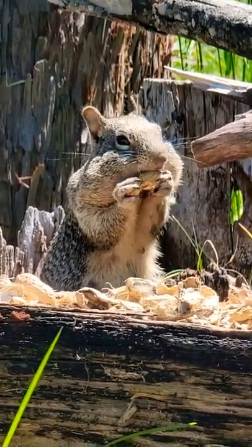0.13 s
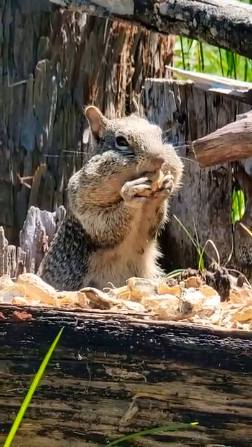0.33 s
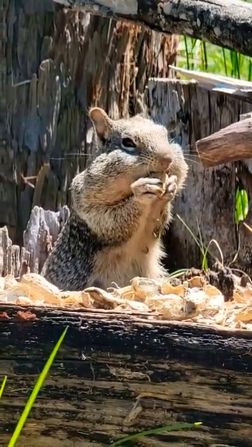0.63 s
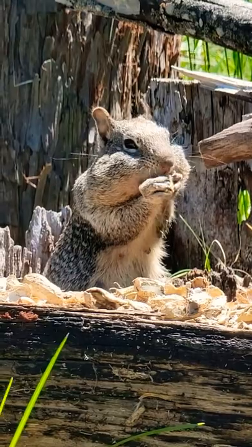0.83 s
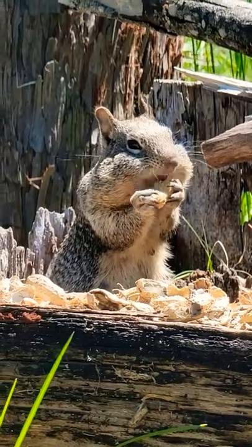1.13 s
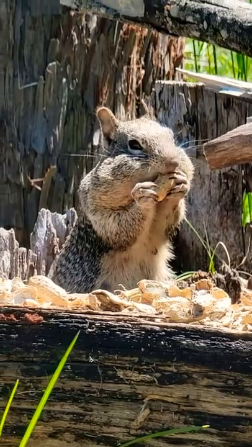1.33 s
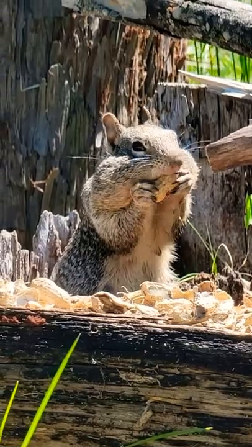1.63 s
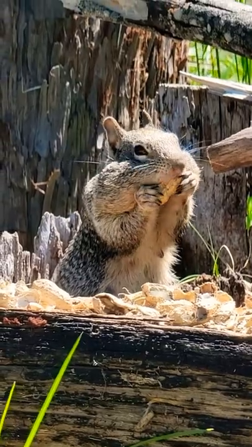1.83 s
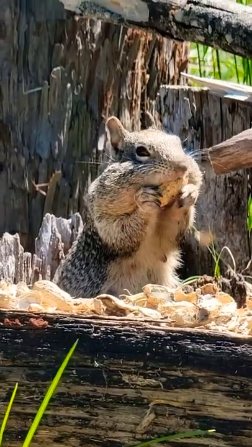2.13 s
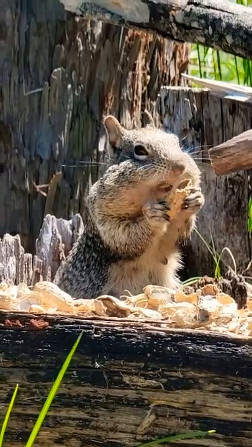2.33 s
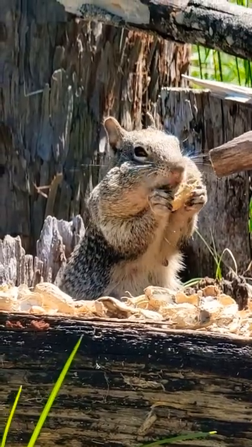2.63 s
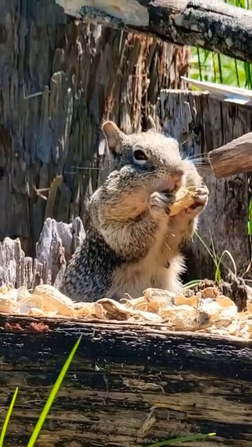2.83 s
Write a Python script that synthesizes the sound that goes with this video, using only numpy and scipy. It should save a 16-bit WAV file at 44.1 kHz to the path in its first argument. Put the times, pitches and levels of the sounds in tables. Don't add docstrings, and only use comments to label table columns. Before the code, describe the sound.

A squirrel cracks a dry nut shell in crisp clicks while birds chirp across a breezy yard

```python
import sys
import numpy as np
from scipy import signal
from scipy.fft import rfft, irfft
from scipy.io import wavfile
from scipy.ndimage import uniform_filter1d

SR = 44100
rng = np.random.default_rng(int(sys.argv[2]) if len(sys.argv) > 2 else 0)


def ratio(d):
    e = np.asarray(d, float) / 20
    return 10 ** e


def unload_wav(signal):
    wavfile.write(
        sys.argv[1],
        SR,
        np.round(np.clip(np.atleast_2d(signal).T, -1, 1) * 32767).astype(np.int16),
    )


N = 131859


def evened(x):
    return x / np.sqrt(np.mean(x ** 2) + 1e-20)


def read(points, hz):
    f, value = np.transpose(points)
    return np.interp(np.log(hz + 1), np.log(f + 1), value)


def add(mix, start_s, sound):
    at = round(start_s * SR)
    part = mix[max(at, 0):][:max(len(sound) + min(at, 0), 0)]
    part += sound[max(-at, 0):][:len(part)]


def drift(count, span_s):
    size = max(int(span_s * SR), 1)
    smooth = uniform_filter1d(rng.standard_normal(count), size)
    return evened(uniform_filter1d(smooth, size))


def band_passed(x, low_hz, high_hz):
    return signal.sosfilt(signal.butter(2, [low_hz, high_hz], "band", fs=SR, output="sos"), x)


# start_s, peak_db, brightest_hz, hollow_body_db, side_wall_db
SNAPS = [(.294, -54, 10000, 0.1, 0.1), (0.3364, -39, 10500, -5, -8), (0.3445, -26, 12160, -3, -8),
         (0.3473, -36, 13000, -5, -8), (0.353, -35, 12500, -5, -3), (0.3555, -47, 11000, -5, -5),
         (0.656, -46, 6130, -14, 5), (0.7277, -43, 10110, -7, 0.1), (0.7466, -15, 7150, -16, 2),
         (.7495, -37, 6000, -13, -2), (0.7625, -36.5, 6000, -8, 2), (0.9174, -23, 7500, 14, -8),
         (0.9194, -26, 7660, 14, -10), (.9217, -34, 7500, 8, -6), (0.933, -46, 6500, -5, -3),
         (.9455, -41.5, 7500, -3, -1), (1.047, -46, 12900, -3, -5), (1.0685, -26.5, 7800, 16, -10),
         (1.0715, -37, 6550, 5, -8), (1.0797, -33, 13540, 0.1, -3), (1.1962, -33, 8030, -8, 3),
         (1.1993, -27, 9200, -8, 5), (1.206, -41, 7000, -5, -1), (1.334, -58, 6234, -3, 2),
         (2.368, -49.5, 9000, -5, 7), (2.426, -47.5, 10300, -5, -10), (2.747, -60, 7450, -5, -8),
         (2.879, -59, 7300, -9, -8), (2.095, -61, 9119, -5, -5)]
# pitch_hz, level_db, t60_s (time to fade by 60 dB)
SHELL = [(2300, -15, .01), (3320, 3, .016), (4770, 1, 0.025), (5360, 1, 0.016), (5720, -3.5, 0.028),
         (6260, -1, 0.014), (7100, -5, .014), (7580, -2, 0.01), (8030, -4.5, 0.016), (8800, -13, .01),
         (10510, 1.5, 0.0061), (13000, 1.5, .009), (14100, 3, 0.0062), (14820, 5, .008)]


def shell_snaps():
    out = np.zeros(N)
    t = np.arange(2300) / SR
    lead_s = 1100 / SR
    u = t - lead_s
    before = np.minimum(u, 0)
    creak = ratio(-22) * np.exp(before / 0.00036)
    grind = ratio(-43) * np.exp(before / 0.007)
    crumb_db, crumb_t60_s = -12, 0.013
    crumb_fade = 0.38 * ratio(crumb_db - 60 * u / crumb_t60_s)
    strain = np.where(u < 0, creak + grind, crumb_fade)
    tick = abs(u) < 0.5 / SR

    hz, db, t60_s = np.transpose(SHELL)[:, :, None]
    ring_fade = ratio(-60 * t / t60_s) + ratio(8 - 60 * t / 0.0025)
    sides = (-1.) ** np.arange(len(SHELL))[:, None]
    spread_oct, luck_db = 0.77, -2
    for start_s, peak_db, bright_hz, hollow_db, wall_db in SNAPS:
        luck = rng.standard_normal((len(SHELL), 2))
        grip_db = hollow_db * (hz < 4000) + wall_db * (hz > 5000) * (hz < 6000)
        bright_db = -6 * (np.log2(hz / bright_hz) / spread_oct) ** 2
        colour_db = db + grip_db + luck_db * luck[:, :1] + bright_db
        tones = np.sin(2 * np.pi * hz * (1 + 0.0035 * luck[:, 1:]) * t)
        ring = (sides * ratio(colour_db) * tones * ring_fade).sum(0)
        crumbs = rng.standard_normal(len(t)) * strain
        snap = signal.fftconvolve(crumbs + tick, ring)[:len(t)]
        add(out, start_s - lead_s, ratio(peak_db - 3.5) * snap / abs(snap).max())
    return out


# start_s, length_s, level_db, centre_hz
RUSTLES = [
    (0.276, 0.18, -77, 11100),
    (0.6, 0.1, -74, 6000),
    (.93, 0.02803, -74, 9000),
    (1.317, 0.11, -80, 6450),
    (2.342, 0.16, -80, 7900),
    (1.188, 0.0077, -58, 9100),
]


def paw_rustles():
    out = np.zeros(N)
    for start_s, length_s, db, centre_hz in RUSTLES:
        t = np.arange(0, length_s, 1 / SR)
        grit = rng.standard_normal(len(t)) * ratio(6 * drift(len(t), 0.004))
        grit = band_passed(grit, centre_hz / 1.4, min(centre_hz * 1.4, 16000))
        add(out, start_s, ratio(db) * evened(grit) * np.sin(np.pi * t / length_s))
    return out


def note(length_s, from_hz, to_hz, db, warble_hz, wobble):
    t = np.arange(0, length_s, 1 / SR)
    warble_rate_hz = 174.8 * (1 + 0.053 * drift(len(t), 0.012))
    warble = np.sin(2 * np.pi * (np.cumsum(warble_rate_hz) / SR + rng.random()))
    depth = warble_hz / 124
    hz = from_hz + (to_hz - from_hz) * t / length_s + warble_hz * warble
    hz = hz + wobble * 18 * drift(len(t), 0.0033) * depth
    flutter_db = 2.8 * drift(len(t), 0.0034) * min(depth, 1)
    shape = np.sin(np.pi * (t / length_s) ** 0.6) ** 0.78 * ratio(flutter_db)
    return ratio(db + 9) * shape * np.sin(2 * np.pi * np.cumsum(hz) / SR)


# start_s, level_db, pitch_factor, stretch_factor
CHIRPS = [
    (-.07, -61, 1.027, 0.79),
    (.285, -59, 1.02, 0.91),
    (.678, -58, 1.027, 0.82),
    (1.016, -57.5, 1.01, 0.85),
    (1.382, -60.5, 1.01, 1.03),
    (1.94, -63, 1.05, 1.07),
    (2.35, -60.5, 1, 1.09),
]
# length_s, from_hz, to_hz, level_db, warble_hz (depth)
OPENINGS = [
    (.055, 4090, 4100, -74, 120),
    (0.055, 4050, 4030, -67, 150),
    (0.048, 4080, 4040, -57.5, 130),
    (0.05, 4400, 3600, -54, 76),
    (0.061, 4170, 4100, -62.5, 150),
    (.062, 4340, 4290, -56, 180),
    (.075, 4150, 3980, -60.5, 250),
]
# delay_s, length_s, from_hz, to_hz, level_db
NOTES = [
    (.012, 0.046, 3370, 3225, -8),
    (.052, 0.083, 3320, 3090, 2.6),
    (.062, 0.0905, 3670, 3500, -6),
    (.085, 0.071, 2900, 2770, -3.5),
    (.045, 0.08, 4200, 4000, -10),
]


def sparrow():
    out = np.zeros(N)
    rasp_s = 0.15
    t = np.arange(0, rasp_s, 1 / SR)
    rasp_shape = np.sin(np.pi * (t / rasp_s) ** 0.28)
    for (start_s, db, pitch, stretch), opening in zip(CHIRPS, OPENINGS):
        rasp = evened(band_passed(rng.standard_normal(len(t)), 3600, 6040))
        add(out, start_s - 0.015, ratio(db - 7) * rasp * rasp_shape)
        add(out, start_s, note(*opening, wobble=0.9))
        for delay_s, length_s, from_hz, to_hz, rel_db in NOTES:
            tone = note(length_s * stretch, from_hz * pitch, to_hz * pitch, db + rel_db, 105, wobble=0.6)
            add(out, start_s + delay_s * stretch, tone)
    return out


# start_s, length_s, from_hz, to_hz, level_db
WHISTLES = [(0.192, 0.098, 5530, 5390, -73.5), (0.248, 0.069, 4850, 4000, -68),
            (0.765, 0.12, 5150, 4830, -64), (0.878, 0.068, 4510, 3790, -63),
            (1.897, 0.096, 5620, 5610, -81.5), (1.92, 0.032866, 5200, 5030, -69),
            (1.996, 0.03194, 4950, 4850, -70), (2.592, 0.039, 3600, 3575, -65.5),
            (2.956, 0.0335, 4280, 4480, -72), (0.471, 0.057, 4010, 3745, -71),
            (1.553, 0.037, 3444, 3350, -65.5), (0.942, .09, 3390, 3300, -70),
            (2.562, 0.038, 2930, 2930, -70)]
WHISTLE_WARBLE_HZ = [188, 400, 310, 300, 26, 93, 91, 24, 20, 105, 116, 200, 40]


def far_birds():
    out = np.zeros(N)
    for (start_s, *whistle), warble_hz in zip(WHISTLES, WHISTLE_WARBLE_HZ):
        add(out, start_s, note(*whistle, warble_hz, wobble=4.2))
    return out


def ports(x, lead, pan_db):
    right = irfft(rfft(x) * np.exp(-1j * lead), N)
    return np.array([x * ratio(pan_db / 2), right * ratio(-pan_db / 2)])


def echoes(x, t60_s):
    t = np.arange(SR // 2) / SR
    sparse = rng.random((2, len(t))) < 0.3
    taps = rng.standard_normal((2, len(t))) * sparse * ratio(-60 * t / t60_s) * (t > 0.002)
    taps = taps / np.linalg.norm(taps, axis=1, keepdims=True)
    return signal.fftconvolve(x[None], taps, axes=1)[:, :N]


# pitch_hz, lead_radians
SNAP_LEAD = [(2000, .2), (3600, 1.6), (5000, 1.1), (7000, 1.2), (9500, 1.0), (11000, .9), (12500, 1.6),
             (16000, 1.2)]


def nut_close_by():
    nut = shell_snaps() + paw_rustles()
    nut = signal.sosfilt(signal.butter(4, 2000, "high", fs=SR, output="sos"), nut)
    lead = read(SNAP_LEAD, np.fft.rfftfreq(N, 1 / SR))
    return ports(nut, lead, pan_db=2.4) + ratio(-19) * echoes(nut, t60_s=0.22)


def birds_in_yard():
    song = sparrow() + far_birds()
    wall = np.zeros(N)
    add(wall, 0.105, song * ratio(-20))
    lead = 2 * np.pi * np.fft.rfftfreq(N, 1 / SR) * 0.00009
    return ports(song + wall, lead, pan_db=-1.9) + ratio(-2.5) * echoes(song, t60_s=0.29)


# pitch_hz, likeness (1 is identical)
SAME = [(25, 0.75), (60, 0.43), (130, 0.97), (290, 0.91), (640, 0.78), (1200, 0.91), (2500, 0.8),
        (5000, 0.03333)]
# pitch_hz, difference_db
SIDES = [(25, 2), (70, 2), (130, -2.5), (290, -4), (640, 1), (1300, -7), (2500, -4), (8000, 0.3)]
# pitch_hz, lead_radians
LEAD = [(60, 0.1), (600, 0.32), (1200, 0.62), (1900, 1.28), (2700, 4.62)]


def all_round(first, second, hz):
    same = np.clip(read(SAME, hz), -1, 1)
    side = ratio(read(SIDES, hz) / 2)
    shared = same * first * np.exp(-1j * read(LEAD, hz))
    return np.array([first * side, (shared + np.sqrt(1 - same ** 2) * second) / side])


# pitch_hz, level_db (per Hz)
WIND = [(8.8, -45), (15, -14.5), (48, -3.5), (65, 2.5), (97, -9), (125, -6.5), (156, -17.5), (239, -19),
        (330, -27), (430, -58.5), (730, -120)]
# time_s, level_db
GUST = [(0.0, -73.5), (0.05, -43.5), (0.56, -50), (0.57, -53), (1.36, -51), (1.39, -56.5), (1.44, -43.5),
        (1.63, -59), (1.68, -45.5), (2.0, -55.5), (2.79, -50.5), (2.99, -54.5)]


def wind():
    hz, t = np.fft.rfftfreq(N, 1 / SR), np.arange(N) / SR
    first, second = rfft(rng.standard_normal((2, N)))
    spectrum = all_round(first, second, hz) * ratio(read(WIND, hz))
    low = 1 / (1 + (hz / 95) ** 6)
    time_s, db = np.transpose(GUST)
    gust = ratio(np.interp(t, time_s, db) - np.mean(db))
    rumble = irfft(spectrum * low, N) * gust + irfft(spectrum * (1 - low), N)
    return ratio(-45.5) * evened(rumble)


def machine_hum():
    hz = 120 + 2.51 * drift(N, 0.21)
    return np.sin(2 * np.pi * np.cumsum(hz) / SR) * ratio(-63 + 3.1 * drift(N, 0.084))


def wash(shape, db, patchy_db, swell_db):
    frames = N // 256 + 5
    hz = np.fft.rfftfreq(1024, 1 / SR)[:, None]
    a, b, c, d, patches = rng.standard_normal((frames, 513, 5)).T
    patches = uniform_filter1d(patches, size=10, axis=0)
    patches = evened(uniform_filter1d(patches, size=14, axis=1))
    swell = evened(uniform_filter1d(rng.standard_normal(frames), size=40))
    z = all_round(a + 1j * b, c + 1j * d, hz)
    z *= ratio(read(shape, hz) + patchy_db * patches + swell_db * swell)
    return ratio(db) * evened(signal.istft(z, nperseg=1024, noverlap=768)[1][:, :N])


# pitch_hz, level_db (per Hz)
TRAFFIC = [(150, -21), (250, -7.5), (269, -17.5), (352, -13), (429, -16.5), (529, -12), (871, -7),
           (1190, -6), (3000, -24.5), (3900, -38.5), (6600, -120)]


def traffic():
    return wash([(180, -72)] + list(TRAFFIC) + [(4000, -46.5)], -55.5, patchy_db=1.0, swell_db=0.59)


# pitch_hz, level_db (per Hz)
AIR = [(1530, -61), (2600, -14), (3410, 2), (6780, -13), (7800, -16.5), (9100, -25), (14400, -15),
       (15400, -17), (16500, -74)]


def air():
    return wash([(1800, -36)] + list(AIR), -73, patchy_db=2.15, swell_db=0.51)


def scene():
    background = wind() + machine_hum() + traffic() + air()
    return nut_close_by() + birds_in_yard() + background


def roll_off(x):
    return signal.sosfilt(signal.butter(12, 16660, fs=SR, output="sos"), x)


def record(dry):
    hz = np.fft.rfftfreq(N, 1 / SR)
    shelf = ratio(-17 * np.clip((hz - 15600) / 250, 0, 1))
    mix = irfft(rfft(dry) * shelf, N)
    return roll_off(mix)


dry = scene()
out = record(dry)
unload_wav(out)
```